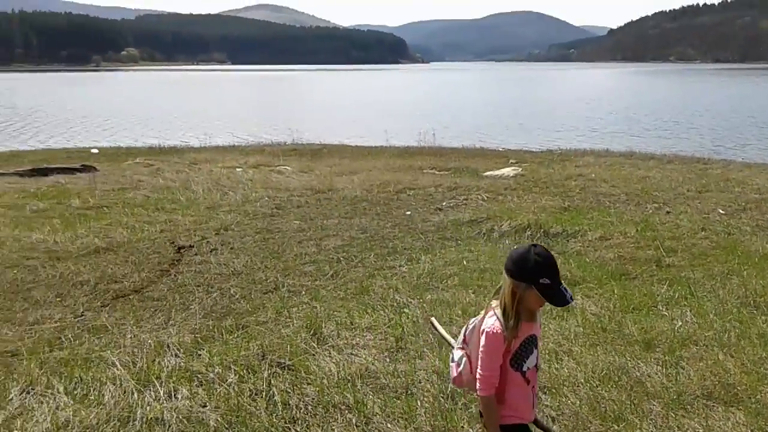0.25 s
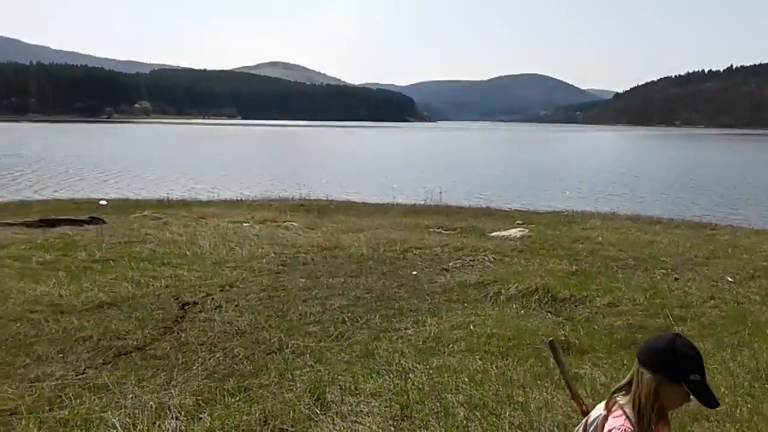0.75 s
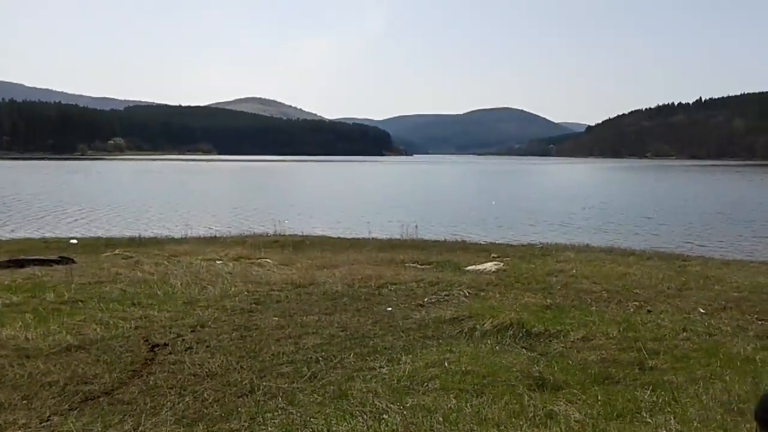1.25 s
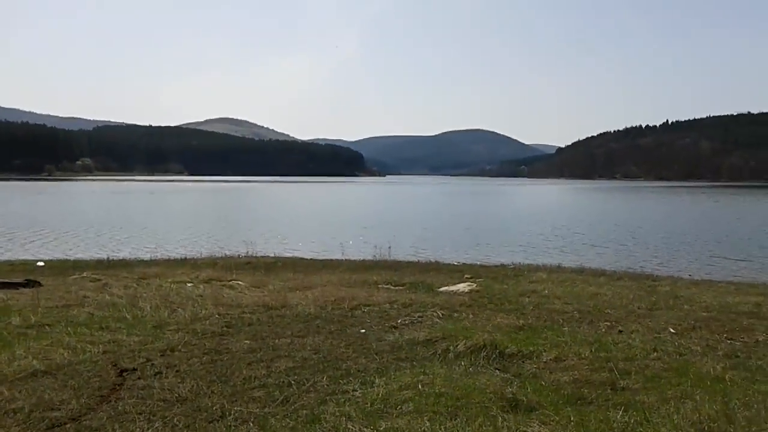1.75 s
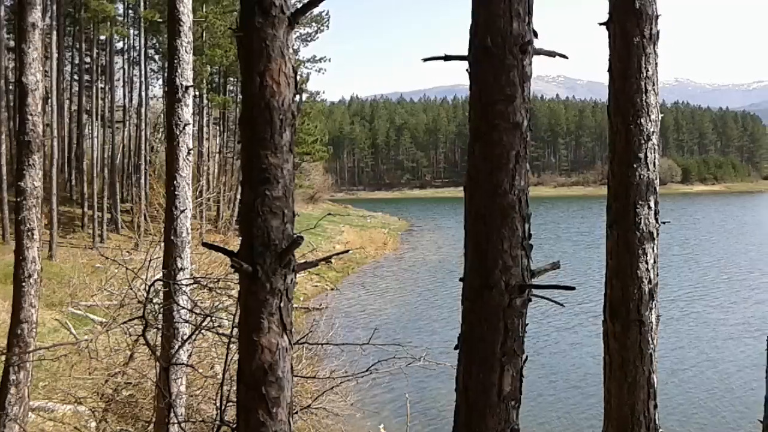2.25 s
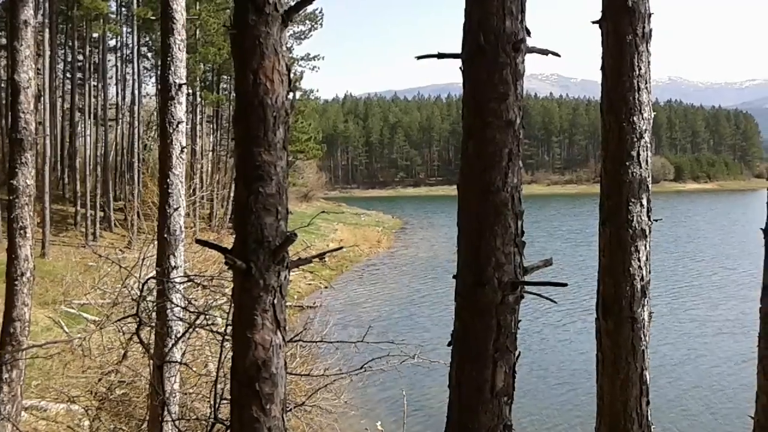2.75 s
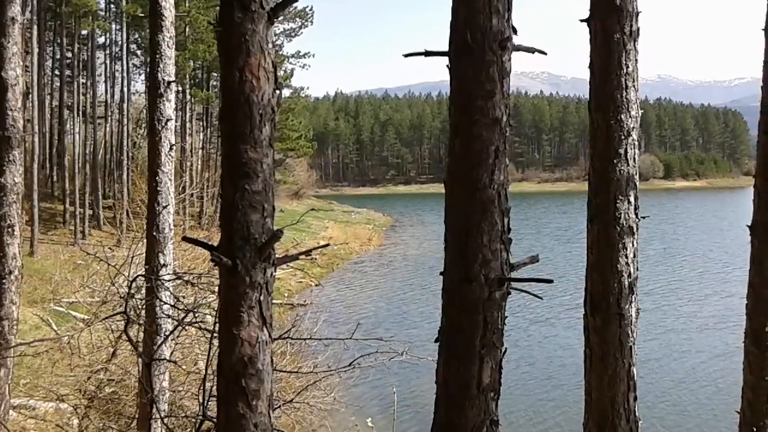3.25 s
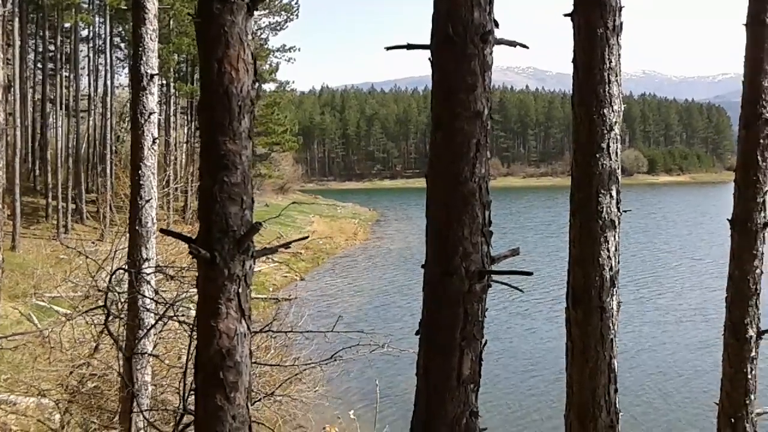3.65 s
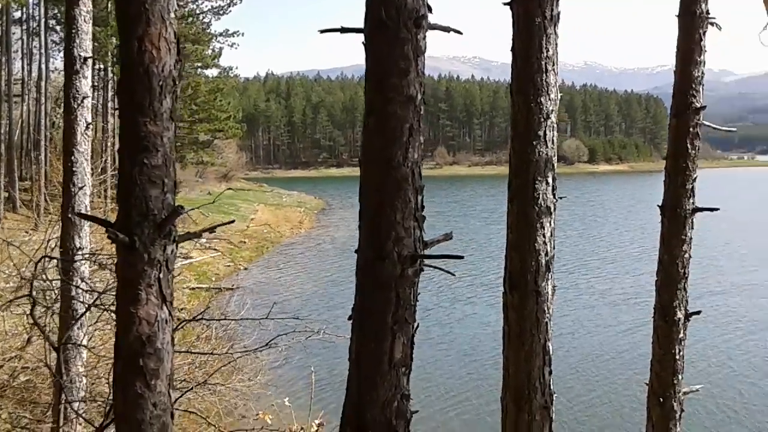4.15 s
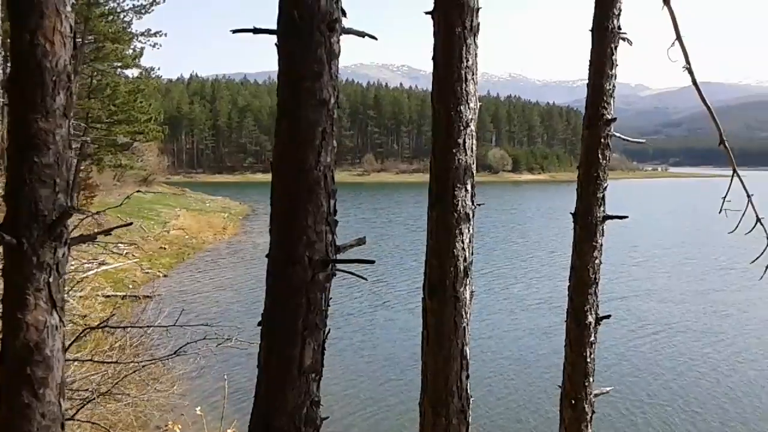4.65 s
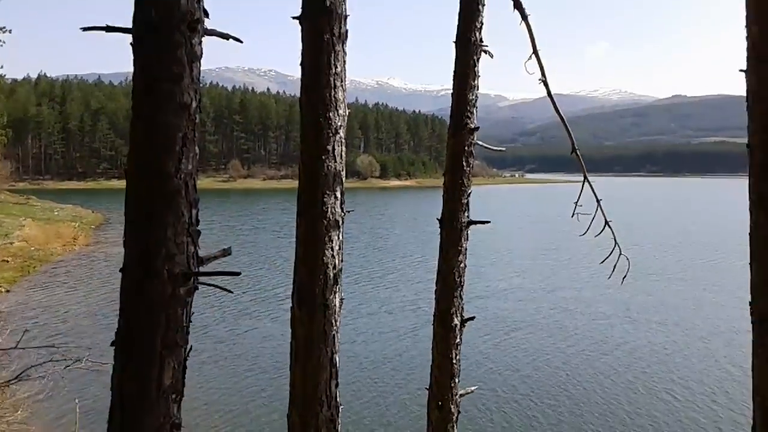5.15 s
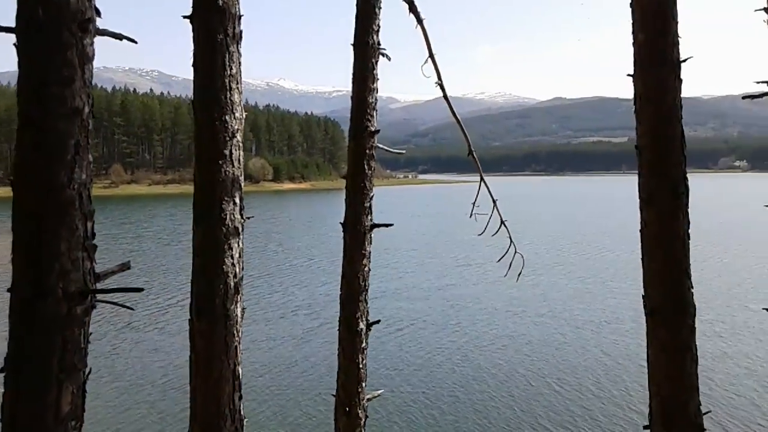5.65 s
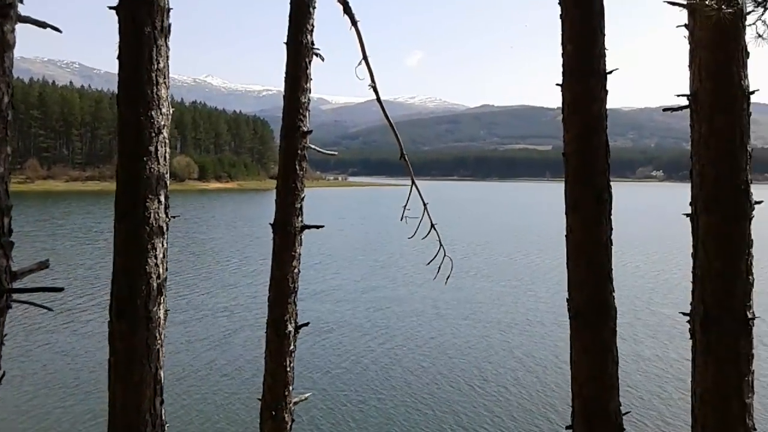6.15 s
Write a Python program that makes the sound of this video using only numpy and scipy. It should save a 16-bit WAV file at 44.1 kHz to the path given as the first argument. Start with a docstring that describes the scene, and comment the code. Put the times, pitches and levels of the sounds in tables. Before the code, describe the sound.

Soft steps swish through lakeside grass, then dry pine litter crunches and twigs snap in bursts, ending in a sharp, loud crackle.

```python
"""Lakeside grass, then dry pine litter and twigs, walked with a small camera and its microphone.
Underfoot, stalks and needles are noise-driven resonances in swelling sweeps; twigs snap and sticks knock
as struck damped modes, with a short echo. Bumps on the case are sinking swings close to the microphone.
Low filtered noise makes the light wind by the water and the tread among the pines, over quiet background
air. Faint wavering sines hum far away, and two ring briefly among the twigs."""
import sys
import numpy as np
from scipy import signal
from scipy.io import wavfile
from scipy.ndimage import uniform_filter1d

SR = 44100
rng = np.random.default_rng(int(sys.argv[2]) if len(sys.argv) > 2 else 0)


def to_wav(s):
    """Save 16-bit WAV."""
    ch = np.atleast_2d(s).T  # columns
    pcm = np.round(np.clip(ch, -1, 1) * 32767)  # PCM
    wavfile.write(sys.argv[1], SR, pcm.astype(np.int16))


N = 282945
PINES_S, TURN_S = 2.165, 4.1  # s, when the pines are reached and when the camera turns

# foot sweeps through pine litter: loudest moment t/s, core-band level/dB before echo,
# core swell by 20 dB t/s, core fade by 20 dB t/s, thin, middle and thick stalks against core level/dB
LITTER = [(2.181, -49, 0.097, 0.161, -1.0, -0.5, -1), (2.347, -40, 0.1, 0.047, -1, 0, -4),
          (2.396, -44, 0.057, 0.13, 0, 0.5, -1), (2.545, -35.5, 0.158, 0.062, -3, -1, -5.0),
          (2.58, -35.9, 0.1, 0.22, -1, -2, -2.5), (2.714, -35.5, 0.035, 0.15, -5, -0.5, -4.5),
          (2.866, -45.5, 0.09, 0.028, -0.0, -1.5, -2), (2.954, -53, 0.19, 0.11, 1.0, 0, -1.5),
          (3.133, -45, 0.045, 0.061, -6, -5, -3), (3.206, -50.0, 0.028, 0.243, 0.0, -2, 2),
          (3.44, -56, 0.41, 0.083, -2, 1.5, 2), (3.612, -52, 0.12, 0.053, 0, 2, 1),
          (3.676, -53.5, 0.037, 0.069, -7, -2, 1.5), (3.829, -54.5, 0.11, 0.09, 3, 0, -1),
          (3.878, -56, 0.029, 0.1, -4.0, -7, 5), (3.963, -57.5, 0.069, 0.07, 1, -1.5, -6),
          (4.124, -60, 0.012, 0.031, 1.0, 6, 1), (4.237, -63.5, 0.18, 1, 1.5, 1, -4.0),
          (4.336, -64, 0.12, 0.12, -5.0, 10.5, 13), (4.582, -56, 0.15, 0.26, 2, 3, 2.5),
          (4.73, -57.5, 0.072, 0.427, -1, -0.5, -1.0), (4.839, -28, 0.041, 0.039, -16, -7.5, -10.5),
          (4.903, -48, 0.04, 0.067, -3, -3, 1.5), (5.119, -44, 0.19, 0.286, 0.5, -0.5, 2.5),
          (5.302, -43, 0.16, 0.062, -6.0, 1.5, 5.5), (5.457, -51, 0.35, 0.27, 7.5, 6, 6),
          (5.642, -39.5, 0.5, 0.12, -5, -3.5, -3), (5.867, -49, 0.11, 0.062, -7, -1.5, 1.5),
          (5.916, -45, 0.086, 0.127, -3.0, -1.5, -3.5), (6.0, -48, 0.043, 0.14, -2.0, 0, -1.5),
          (6.102, -44, 0.037, 0.15, -4, -4.5, -1), (6.179, -39.5, 0.078, 0.57, -3.5, -1, -2),
          (6.303, -32.5, 0.032, 0.579, -9, 0.5, -5), (6.371, -23.5, 0.045, 0.07, -4.5, 1.0, -7.5)]
# spectrum of the lakeside grass: f/Hz, relative level/dB per Hz
GRASS_COLOUR = [(240, -25), (500, -7.5), (1300, -8), (2200, -8.5), (3200, -9.5), (3900, -7.5),
                (4700, -10.5), (6000, -9.5), (7500, -3.5), (9500, -2.5), (11500, -1.5), (14000, -4),
                (16900, -10.5)]
# spectrum of the pine litter before the camera turns: f/Hz, relative level/dB per Hz
LITTER_COLOUR = [(240, -45), (500, -17), (1900, -11.5), (3000, -15.5), (3900, -13), (5000, -3), (6000, -5),
                 (7000, -2.5), (9000, -2), (10700, -4), (13000, -11), (16900, -12)]
# spectrum of the pine litter once the camera has turned: f/Hz, relative level/dB per Hz
TURNED_COLOUR = [(240, -32), (500, -16), (1700, -12), (3000, -17.5), (4000, -10.5), (6000, -6.5),
                 (7500, 1.5), (9300, -6), (10500, -4), (12000, -5), (13300, -11), (15000, -13), (16900, -7)]


def gain_of(db):
    """Decibels to amplitude gain."""
    return 10 ** (np.asarray(db) / 20)


def evened(x):
    """Scales to rms 1."""
    return x / np.sqrt(np.mean(x ** 2) + 1e-20)


def add(mix, s, sound):
    """Mixes a sound in at a time in seconds, cut off at the end of the mix."""
    part = mix[round(s * SR):][:len(sound)]
    part += sound[:len(part)]


def colour(x, points, size=4096):
    """Causal minimum-phase filter with the given spectrum, power gain 1 on white noise."""
    f, db = np.transpose(points)
    bins_hz = abs(np.fft.fftfreq(size, 1 / SR))
    log_gain = np.interp(np.log(bins_hz + 1), np.log(f), db) * np.log(10) / 20
    spectrum = np.exp(np.conj(signal.hilbert(log_gain)))
    taps = np.fft.ifft(spectrum).real[:size // 2]
    return signal.oaconvolve(x, taps / np.linalg.norm(taps))[:len(x)]


def ring(x, hz, width_hz):
    """One damped mode, power gain about 1 on white noise."""
    r = np.exp(-np.pi * width_hz / SR)
    poles = [1, -2 * r * np.cos(2 * np.pi * hz / SR), r * r]
    return np.sqrt(1 - r * r) * signal.lfilter([1, 0, -r], poles, x)


def slow(hz, size=N):
    """Slow random drift: noise low-passed at hz, rms 1."""
    return evened(signal.lfilter(*signal.butter(1, hz, fs=SR), rng.standard_normal(size)))


def lumps_db():
    """Uneven level of the low rumbles in dB, wandering below about 8 Hz."""
    return 3.75 * slow(7.7)


def wind():
    """Wind at the microphone by the water: lumpy low noise that stops at the pines."""
    # wind by the water: t/s, level/dB before lumps and bass cut
    gusts = [(0.0, -67.5), (0.63, -67), (1.02, -59), (1.26, -60.5), (1.38, -63.5), (1.8, -63.5),
             (1.85, -57), (2.05, -67.5), (2.2, -70)]
    # spectrum of the wind: f/Hz, relative level/dB per Hz
    wind_colour = [(18, -33), (40, -10), (100, 1), (300, -5.5), (600, -16), (900, -9.5), (2000, -62)]
    t = np.arange(N) / SR
    s, db = np.transpose(gusts)
    level = gain_of(np.interp(t, s, db) + lumps_db())
    rumble = level * colour(rng.standard_normal(N), wind_colour)
    return np.where(t < PINES_S, rumble, 0)


def air():
    """Quiet steady background: coloured noise."""
    # spectrum of the background: f/Hz, relative level/dB per Hz
    air_colour = [(24, -16), (40, -16), (65, -14), (680, -9), (898, -6), (1130, -16.5), (6800, -19),
                  (16900, -22)]
    return gain_of(-72) * colour(rng.standard_normal(N), air_colour)


def sputter(size, per_s, spread_db, burst_s):
    """Power envelope of random clicks, a few large, each sputtering briefly; mean 1."""
    sizes_db = spread_db * np.minimum(rng.exponential(1, size), 3)
    clicks = gain_of(sizes_db) * (rng.random(size) < per_s / SR)
    return evened(signal.lfilter([1], [1, -np.exp(-1 / (burst_s * SR))], clicks)) ** 2


def sweeps(rows, t):
    """Gain of each stalk kind over time: every foot sweep swells and fades, and their powers add."""
    # share of the dB drop that thick, middle, core and thin stalks follow: ratio [1]
    linger = (0.76, 0.89, 1.0, 0.88)
    bend = 1.324  # exponent: rounded at the top, steeper away from it
    s, db, swell_s, fade_s, thin_db, middle_db, thick_db = np.transpose(rows)[:, :, None]
    drop_db = -20 * np.where(t < s, (s - t) / swell_s, (t - s) / fade_s) ** bend
    gains = []
    for share_db, part in zip((thick_db, middle_db, 0, thin_db), linger):
        power = (gain_of(db + share_db + part * drop_db) ** 2).sum(0)
        gains.append(np.sqrt(power + 1e-12))
    return gains


def rustle(rows, start, end, before, after, per_s, spread_db, clump_db, drift_db, hiss, q, burst_s, shared):
    """Each stalk clicks at its own pitch, some breaks shake all at once; the smallest merge into hiss."""
    # stalk sizes: pitch f/Hz, kind [0 thick, 1 middle, 2 core, 3 thin]
    stalks = [(hz, np.searchsorted((3400, 5900, 11500), hz)) for hz in np.geomspace(500, 16000, 28)]
    # band that carries the sweep level: low f/Hz, high f/Hz
    core_hz = (6000, 11000)
    t = np.arange(start, end, 1 / SR)
    kinds = [np.interp(t, t[::64], g) for g in sweeps(rows, t[::64])]
    breaks = shared * sputter(len(t), 300, spread_db, burst_s)
    steady, swept = np.zeros(len(t)), np.zeros(len(t))
    for hz, kind in stalks:
        power = sputter(len(t), per_s / len(stalks), spread_db, burst_s) + breaks + hiss
        drive = np.sqrt(power) * rng.standard_normal(len(t))
        rung = ring(ring(drive, hz, hz / q), hz, hz / q)
        stalk = np.sqrt(hz) * evened(rung)  # root of pitch keeps the sum flat
        steady += stalk
        swept += stalk * kinds[kind] * gain_of(drift_db * slow(4.0, size=len(t)))
    band = signal.butter(2, core_hz, "band", fs=SR, output="sos")
    # the unswept sum sets the level in the core band
    early, late = (colour(swept, c) / np.std(signal.sosfilt(band, colour(steady, c)))
                   for c in (before, after))
    clumps = gain_of(clump_db * slow(50, size=len(t)))
    return start, np.where(t < TURN_S, early, late) * evened(clumps)


def ground_echo(x):
    """The ground and trunks return a short sparse tail, 11.5 dB down."""
    t = np.arange(2600) / SR
    reflections = rng.standard_normal(len(t)) * (rng.random(len(t)) < .1)
    tail = reflections * gain_of(-60 * t / 0.028) * (t > .0012)  # 60 dB decay in 28 ms
    return gain_of(-11.5) * signal.oaconvolve(x, tail / np.linalg.norm(tail))[:N]


def tone(start, end, hz, db, width_hz):
    """A sine whose pitch wavers randomly; it fades in and out."""
    n = round((end - start) * SR)
    turns = np.cumsum(hz + width_hz * slow(28, size=n)) / SR
    return gain_of(db) * np.sqrt(2) * np.sin(2 * np.pi * turns) * signal.windows.tukey(n, .4)


def ground_at(s):
    """The colour of the ground heard at a time."""
    if s < PINES_S:
        return GRASS_COLOUR
    return LITTER_COLOUR if s < TURN_S else TURNED_COLOUR


def crack(db, modes_hz, q, tick, edge, t60, splinters, points):
    """A break: one blow and a splinter spray into damped modes, with a bare tick and its sharp edge."""
    t = np.arange(700) / SR
    drive = splinters * rng.standard_normal(len(t)) * gain_of(-60 * t / t60)
    drive[0] = 1  # the blow
    sound = sum(evened(ring(ring(drive, hz, hz / q), hz, hz / q)) for hz in modes_hz)
    sound = sound + tick * evened(colour(drive, points))
    sound = sound + edge * evened(np.diff(drive, n=2, prepend=[0, 0]))
    return gain_of(db) * sound / abs(sound).max()


def bump(db, hz):
    """A push on the case: a quick swing whose pitch sinks as it dies, then a short hollow ring."""
    t = np.arange(2600) / SR
    swing = np.sin(2 * np.pi * 0.87 * np.log(1 + 2.43 * hz * t)) * np.exp(-hz * t / 0.79)
    sound = swing + 2.05 * ring(swing, 180, 77) * np.sqrt(60 / SR)
    return gain_of(db) * sound / abs(sound).max()


def tread():
    """Tread of feet among the pines: lumpy low noise whose level follows the thick litter stalks."""
    # spectrum of the tread: f/Hz, relative level/dB per Hz
    tread_colour = [(18, -48), (50, -8), (200, -2.5), (400, -3), (900, -24.5), (2000, -57)]
    offset_db, follow, smooth_s = -40.5, 0.54, 0.043  # dB, dB per dB, s
    t = np.arange(N) / SR
    thick_db = np.interp(t, t[::64], 20 * np.log10(sweeps(LITTER, t[::64])[0]))
    level_db = offset_db + follow * uniform_filter1d(thick_db, round(smooth_s * SR))
    rumble = gain_of(level_db + lumps_db()) * colour(rng.standard_normal(N), tread_colour)
    return np.where(t < PINES_S, 0, rumble)


def scene():
    """All sources at the camera's one microphone; only the ground sounds near the feet echo."""
    # foot sweeps through grass: loudest moment t/s, core-band level/dB before echo,
    # core swell by 20 dB t/s, core fade by 20 dB t/s, thin, middle and thick stalks against core level/dB
    grass = [(0.061, -63, 0.696, 0.34, 1, 3, 7), (0.222, -50.5, 0.21, 0.37, -1.0, -0.5, -0.5),
             (0.414, -63, 0.032, 0.33, -1, -1, 0), (0.662, -50, 0.15, 0.77, -2.0, -0.5, -2.5),
             (0.86, -44.5, 0.04, 0.3, -4.5, -4, -3.5), (1.028, -53.5, 0.159, 0.12, 0, -2, -1.0),
             (1.315, -54.5, 0.274, 0.18, -2, -0.0, -0.5), (1.511, -50.5, 0.12, 0.256, 1.5, -0.5, -2.5),
             (1.625, -46, 0.078, 0.23, 0.5, -1.5, -1.0), (1.827, -53.5, 0.094, 0.21, 0, 2, 0),
             (1.9, -53, 0.032, 0.32, -3, 1, 0), (2.171, -57.5, 0.172, 0.697, -5, -3.0, 1.0)]
    # faint far hums and two short rings among the twigs: start t/s, end t/s, pitch f/Hz, level/dB, waver f/Hz
    tones = [(.5, 1.49, 559, -69, 0.7), (0, 0.37, 1550, -71.5, 12), (4.84, 5.2, 1560, -71.5, 12),
             (2.376, 2.412, 2090, -51.5, 37), (3.678, 3.693, 2450, -58, 140)]
    # thicker sticks knock: t/s, peak level/dB before echo, pitch f/Hz
    knocks = [(0.4116, -32.5, 3130), (0.8537, -20, 1890), (1.8918, -31, 2540), (2.011, -34.5, 2370),
              (2.3886, -34, 2170), (2.4033, -37, 2230), (2.4616, -31.5, 2130), (2.5856, -34, 1610),
              (3.4598, -41.5, 1850), (3.6148, -39, 2060), (3.6718, -35, 1880), (3.6793, -33.5, 2510),
              (4.121, -44, 1450), (4.2502, -46.5, 1440), (4.579, -43.5, 1190), (5.0985, -37, 1870),
              (5.1432, -39, 2100), (5.3025, -41.5, 1490), (5.3717, -40, 1800), (5.569, -38, 1730),
              (5.8546, -42.5, 1360), (5.9791, -47, 1530), (6.3488, -24.5, 2000), (6.3736, -36, 1650)]
    # thin twigs break: t/s, peak level/dB before echo, pitch f/Hz
    snaps = [(0.4124, -37, 4700), (0.4302, -39.5, 11000), (0.4708, -27, 9800), (0.648, -31, 10790),
             (0.8539, -18.5, 11000), (1.8925, -21.5, 8950), (2.0105, -25.5, 8700), (2.281, -29, 5000),
             (2.3077, -24, 7870), (2.3193, -23, 7000), (2.34, -21, 7200), (2.3418, -12.5, 9000),
             (2.3477, -17, 5700), (2.355, -28, 7030), (2.4334, -22, 8950), (2.437, -24, 8000),
             (2.4974, -31, 8850), (2.52, -19, 8850), (2.9214, -31, 6600), (2.9646, -32, 8400),
             (3.1245, -32, 8100), (3.1301, -29.5, 7500), (3.1434, -29, 7810), (3.6142, -31, 8350),
             (3.6723, -27, 9700), (3.6738, -30.5, 5000), (4.577, -32, 10300), (4.5845, -31, 6900),
             (4.8098, -22, 7490), (4.825, -25, 8100), (4.839, -16.5, 7900), (4.8412, -20.5, 7750),
             (4.8576, -17, 7200), (5.1067, -31, 8640), (5.131, -31, 9420), (5.1827, -16, 7840),
             (5.252, -24, 6900), (5.322, -24.5, 10100), (5.3407, -27, 8400), (5.373, -13, 10000),
             (5.3917, -23, 10700), (5.4115, -26, 11040), (5.4656, -24, 8040), (5.5245, -24.5, 7940),
             (5.57, -27, 8870), (5.587, -19, 9900), (5.642, -23, 9600), (5.878, -27, 7340),
             (5.9235, -25.5, 7790), (6.012, -28, 8090), (6.044, -30, 7890), (6.0885, -33, 7800),
             (6.17, -23, 9600), (6.2938, -21, 8480), (6.2993, -22, 8090), (6.305, -17, 8800),
             (6.318, -13, 7440), (6.3345, -13, 7940), (6.34, -17, 8020), (6.348, -6, 8400),
             (6.3696, -7, 8050), (6.375, -6, 8000)]
    # the camera body is bumped: t/s, peak level/dB before bass cut, f/Hz (swing starts at 2.1 times this)
    bumps = [(0.853, -26.5, 400), (1.0092, -46, 340), (1.1144, -46, 259), (1.178, -42, 412),
             (1.215, -41, 310), (1.2332, -39, 364), (1.2643, -40.5, 320), (1.2878, -41, 347),
             (1.439, -47, 270), (1.6815, -43.5, 370), (1.8224, -47, 280), (1.859, -43, 280),
             (1.9358, -44, 285), (1.9883, -41, 310), (2.15, -40, 347), (2.3414, -42, 280),
             (2.3904, -42, 268), (2.5388, -44, 286), (2.5838, -41.5, 420), (3.2069, -42.5, 450),
             (3.6721, -45, 370), (4.1184, -41, 320), (4.2486, -37.5, 484), (4.292, -39.5, 383),
             (4.33, -45.5, 450), (4.5522, -47.5, 520), (4.5771, -46, 483), (5.301, -36, 625),
             (5.647, -47, 370), (5.8544, -45, 358), (6.378, -37, 357)]
    near, mix = np.zeros(N), wind() + air() + tread()
    add(near, *rustle(grass, 0, PINES_S, GRASS_COLOUR, GRASS_COLOUR, per_s=6000, spread_db=2.5,
                      clump_db=1.03, drift_db=0.6, hiss=3.1, q=6.0, burst_s=0.00036, shared=0.21))
    add(near, *rustle(LITTER, PINES_S, N / SR, LITTER_COLOUR, TURNED_COLOUR, per_s=2200, spread_db=2.5,
                      clump_db=1.46, drift_db=0.62, hiss=1.4, q=4.5, burst_s=0.00045, shared=1.2))
    for row in tones:
        add(mix, row[0], tone(*row))
    for s, db, hz in knocks:  # a stick rings at its pitch and about an octave above
        add(near, s, crack(db, [hz, 1.905 * hz], q=2.2, tick=0.16, edge=0.025, t60=0.0053,
                           splinters=0.37, points=ground_at(s)))
    for s, db, hz in snaps:
        add(near, s, crack(db, [hz], q=3.4, tick=0.61, edge=0.41, t60=0.0047,
                           splinters=0.46, points=ground_at(s)))
    for s, db, hz in bumps:
        add(mix, s, bump(db, hz))
    return (mix + near + ground_echo(near))[None]


def record(dry):
    """Bass cut of the small microphone at 45 Hz, then the band limit at 17020 Hz."""
    cut = signal.sosfilt(signal.butter(2, 45, "high", fs=SR, output="sos"), dry)
    limit = signal.firwin(1023, 17020, window=("kaiser", 9), fs=SR)
    return signal.oaconvolve(cut, limit[None], "same")


dry = scene()
out = record(dry)
to_wav(out)
```